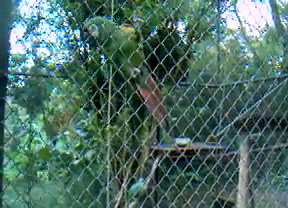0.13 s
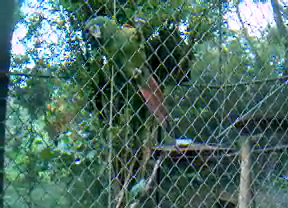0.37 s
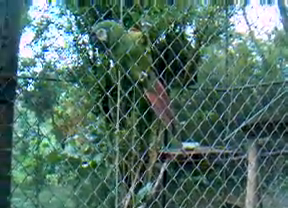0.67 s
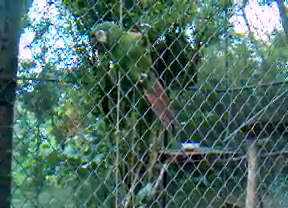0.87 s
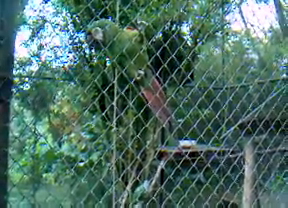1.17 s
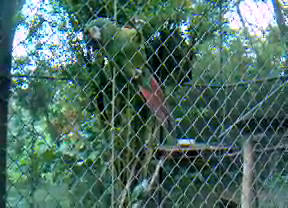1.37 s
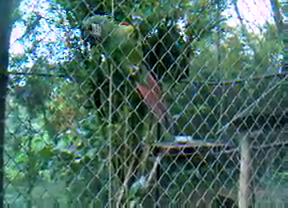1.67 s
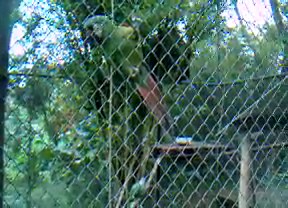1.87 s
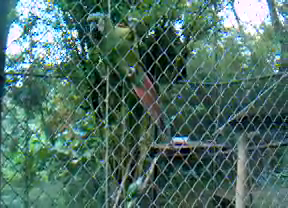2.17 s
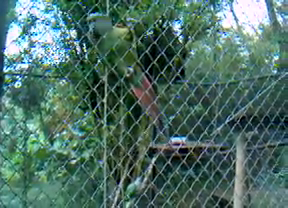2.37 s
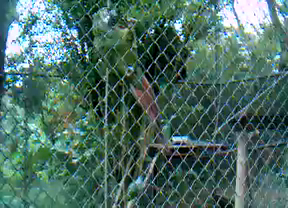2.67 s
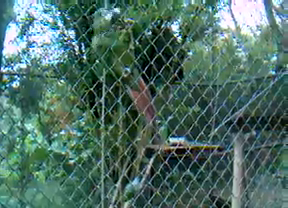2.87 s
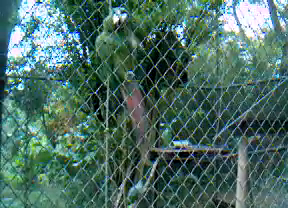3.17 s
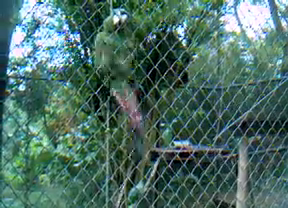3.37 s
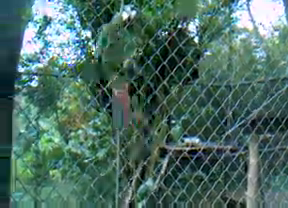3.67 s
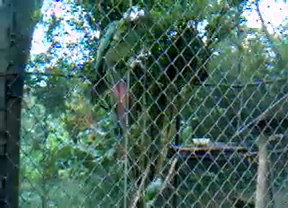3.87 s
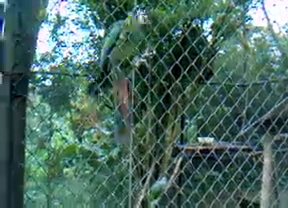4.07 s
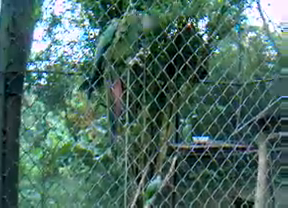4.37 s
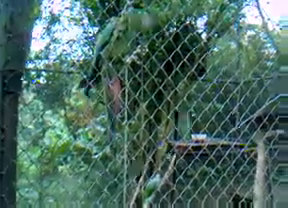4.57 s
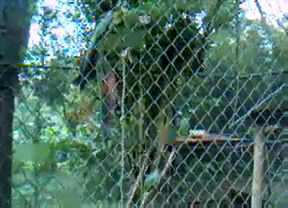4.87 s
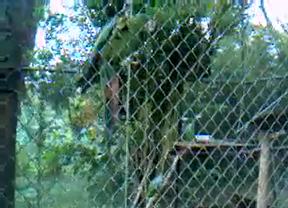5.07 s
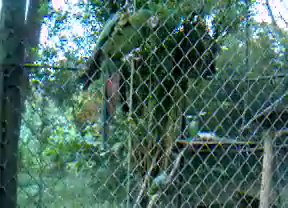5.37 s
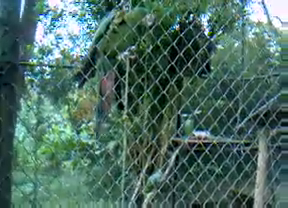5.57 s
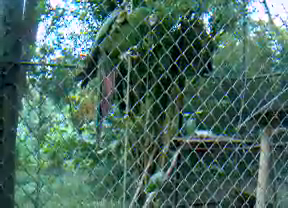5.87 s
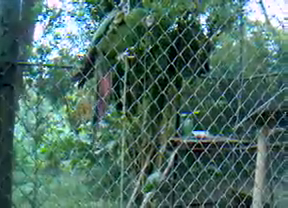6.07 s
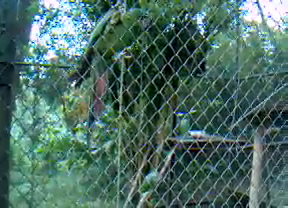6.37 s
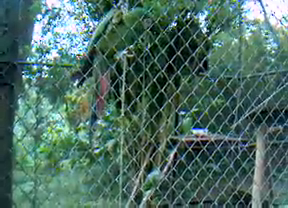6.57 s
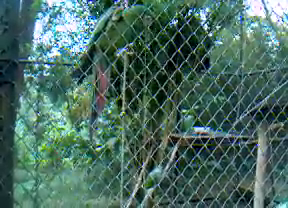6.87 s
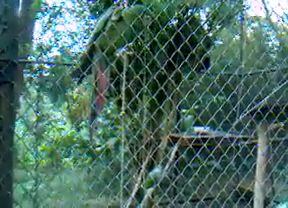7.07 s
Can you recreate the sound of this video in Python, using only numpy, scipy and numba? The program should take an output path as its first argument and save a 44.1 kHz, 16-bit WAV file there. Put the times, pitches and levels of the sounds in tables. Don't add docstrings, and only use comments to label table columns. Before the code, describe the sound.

Outdoors in a garden aviary, heard through a small, gritty, band-limited camera microphone. From 0 to about 2.5 s large parrots screech very close: a call already under way, a held screech at 0.2, another at 0.7, a short loud burst at 1.3 running into the longest screech until 2.0, and one more at 2.1. They are rasping and throbbing, with shrill squeals breaking through and crackling overload, each group dying into a fading note. Then it is much quieter: steady hush, high cricket chirps, distant breathy squawks and hoarse squeaks, thin whistles, a downward swoop at 3.6. Sound vanishes from 3.94 to 4.04, and a soft tick follows at 4.13. A whistle swoops up at 5.15; far squawks strengthen around 5.5. A buzzy rapid trill runs from 6.35 to 6.8, with wire ticks at 6.38 and, sharper, 6.47. At 6.85 a low growl leaps into a brief close squawk at 7.0.

```python
import sys
import numpy as np
from scipy import signal
from scipy.fft import rfft, irfft, next_fast_len
from scipy.io import wavfile
from scipy.ndimage import uniform_filter1d, map_coordinates
from numba import njit

SR = 44100
rng = np.random.default_rng(int(sys.argv[2]) if len(sys.argv) > 2 else 0)


def int16_out(signal):
    q = np.round(np.clip(np.atleast_2d(signal).T, -1, 1) * 32767)
    wavfile.write(sys.argv[1], SR, q.astype(np.int16))


def attenuation_scalar(level_db):
    decades = np.asarray(level_db, float) / 20
    return 10 ** decades


N = 318565

# frequency in Hz, level in dB per Hz.
HUSH_COLOUR = [(15, -33), (25, -5.5), (130, 0), (223, -6), (690, -9), (1210, -12.5), (1360, -8.5),
               (1700, -10.5), (1900, -10), (2550, -11), (4290, -6.5), (5500, -2), (7150, -34),
               (12100, -120)]
# middle of the chirp in seconds (less 0.012), peak level in dB.
CRICKET_CHIRPS = [(2.6349, -30), (2.7496, -34), (2.8599, -31), (2.9564, -35), (3.035, -33), (3.1779, -31.5),
                  (3.3804, -33.5), (3.4883, -38), (3.5816, -30.5), (3.7062, -33), (3.8051, -29),
                  (3.923, -31.5), (4.125, -27.5), (4.2327, -32.5), (4.3101, -32.5), (4.7437, -35),
                  (5.0567, -31), (5.2054, -30.5), (5.3457, -30), (5.4826, -28), (5.5871, -34.5),
                  (5.6778, -28.5), (5.8234, -30), (5.9574, -30.5), (6.0681, -24.5), (6.1667, -30),
                  (6.2782, -32.5), (6.9206, -29.5), (7.1359, -24)]
# frequency in Hz, time to fall 60 dB in seconds.
YARD_DECAY = [(500, .5), (2000, 0.65), (6000, 0.28)]

# start in seconds, hold in seconds, level in dB.
FAR_SQUAWKS = [(2.499, 0.18, -37), (2.831, 0.031, -34.5), (3.016, 0.032, -33.5), (3.208, 0.0086, -36.5),
               (3.82, 0.098, -41.5), (4.115, .02, -34.5), (4.32, 0.23, -41), (4.701, 0.53, -41),
               (5.19, .04, -34.5), (5.37, .03, -34), (5.5, 0.041, -29), (5.665, 0.018, -29.5),
               (5.84, 0.028, -32.5), (6.06, 0.27, -37.5), (6.4, 0.37, -34.5), (6.9, .05, -35),
               (7.04, .18, -35.5)]
# resonance in Hz, width in Hz, level in dB.
FAR_THROAT = [(1802, 600, -6.5), (3300, 450, -1), (5000, 1400, -0.5)]
# start in seconds, length in seconds, from Hz, to Hz, peak level in dB.
SQUEAKS = [(2.6, .09, 3300, 3400, -47), (2.82, .07, 3200, 3453, -41.5), (2.999, .06, 3450, 3450, -43.5),
           (3.4, .25, 1890, 1865, -51), (3.76, .11, 900, 895, -45.5), (4.08, .12, 3220, 3283, -39.5),
           (4.08, .12, 1600, 1900, -46.5), (4.263, .25, 830, 836, -49), (4.28, .09, 3220, 3345, -38.5),
           (4.38, .14, 4520, 4470, -43), (4.39, .09, 3290, 3420, -40), (4.497, .14, 3200, 3132, -42.5),
           (5.308, .11, 2757, 3240, -40.5), (5.33, .09, 1800, 1750, -44), (5.489, .09, 3300, 3128, -42),
           (5.629, .11, 3170, 3287, -37.5), (5.81, .08, 3100, 3291, -40.5), (6.11, .1, 3230, 3290, -42),
           (6.27, .08, 3224, 3282, -43.5), (7.05, .07, 4060, 3900, -40.5), (7.101, .04, 3300, 3258, -43.5),
           (7.18, 0.037, 1594, 1800, -40)]
# start in seconds, length in seconds, from Hz, to Hz, peak level in dB.
WHISTLES = [
    (1.08, 0.23, 3166, 3250, -40.5),
    (2.55, 1.18, 3947, 3750, -46),
    (2.5, 1.51, 2548, 2320, -49),
    (4.05, .6, 2327, 2255, -48.5),
    (4.66, .36, 4980, 5000, -47),
    (5.7, 0.37, 4970, 4943, -46),
    (6.771, .12, 2253, 2320, -46.5),
]
# time in seconds, pitch in Hz, level in dB.
SWOOPS = [
    [(3.575, 5500, -44), (3.62, 5250, -35.5), (3.65, 4816, -33), (3.69, 3815, -40.5), (3.75, 3300, -43)],
    [(5.135, 3300, -43), (5.165, 4120, -33.5), (5.195, 4850, -33.5), (5.22, 5500, -42.5)],
]
SWOOP_FLUTTER = (.014, .022)
# time in seconds, level in dB, held pitch in Hz.
TRILL = [
    (6.355, -33.5, 5500),
    (6.43, -26, 5480),
    (6.48, -28.5, 5234),
    (6.6, -30, 5176),
    (6.7, -31.5, 5217),
    (6.83, -41, 5360),
]
# time in seconds, peak level in dB.
BEAK_TICKS = [
    (4.1267, -25),
    (6.3802, -25),
    (6.4691, -19.5),
]

# start in seconds, hold in seconds, level in dB, attack in seconds,
# release in seconds.
SCREECHES = [
    (0.0, 0.019, -13, .01, 0.1),
    (.158, 0.35, -16.5, .012, 0.21),
    (.694, 0.28, -15, .045, 0.15),
    (1.285, 0.023, -11, .03, 0.044),
    (1.31, .72, -17, .03, 0.037),
    (2.08, 0.3, -17, 0.012, .22),
    (7.005, 0.0093, -17.5, .14, 0.032),
]
# resonance in Hz, width in Hz, level in dB.
NEAR_THROAT = [(1250, 860, -6), (1986, 700, -0.5), (3300, 900, -2.5), (4470, 900, -1), (5500, 1200, -6)]
# start in seconds, length in seconds, strongest line from Hz, to Hz,
# peak level in dB.
DEEP_NOTES = [
    (.355, 0.076, 2335, 2284, -23),
    (1.304, 0.05, 2166, 2306, -20.5),
    (1.371, .04, 2350, 2375, -18),
    (1.428, 0.038, 2364, 2428, -18.5),
]
# start in seconds, length in seconds, from Hz, to Hz, peak dB.
SHRILL_NOTES = [(0, 0.069, 1581, 1602, -25), (0.414, 0.041, 1914, 1814, -22),
                (0.698, 0.03, 1866, 2100, -21.5), (0.736, 0.036, 1526, 1578, -24.5),
                (.75, 0.048, 1084, 1097, -26), (0.794, 0.084, 2330, 2240, -25),
                (0.949, 0.032, 2562, 2510, -28), (0.991, 0.039, 1854, 1890, -28),
                (1.472, 0.042, 1711, 2000, -19), (1.514, 0.026, 1947, 1795, -20.5),
                (1.543, 0.042, 1750, 2110, -18.5), (1.587, 0.055, 1939, 1904, -18.5),
                (1.66, 0.038, 1910, 1823, -20), (1.695, 0.039, 1803, 1890, -20.5),
                (1.757, .028, 1870, 1872, -18), (1.788, 0.026, 1801, 1817, -22),
                (1.821, 0.028, 1783, 1851, -17), (1.797, 0.038, 1174, 1225, -23.5),
                (1.845, 0.034, 1750, 1698, -22.5), (2.08, 0.062, 1385, 1870, -19.5),
                (2.077, 0.028, 998, 1202, -23.5), (2.157, 0.027, 1733, 2173, -19),
                (2.198, 0.049, 2003, 1774, -19.5), (2.253, 0.027, 1876, 1952, -24),
                (2.29, 0.033, 1850, 1960, -21), (7.018, 0.025, 1315, 1288, -28.5)]
# start in seconds, length in seconds, from Hz, to Hz, peak dB.
FADING_NOTES = [
    (0, 0.17, 2104, 2132, -28.5),
    (0.491, .16, 2318, 2266, -27.5),
    (0.951, .3, 2264, 2303, -25.5),
    (2.33, .18, 1867, 1909, -25),
]
# start in seconds, length in seconds, from Hz, to Hz, peak dB.
UPPER_NOTES = [(0, 0.09, 3302, 3380, -27), (0, 0.061, 4122, 3975, -21.5), (0.351, 0.037, 4510, 4846, -25.5),
               (0.384, 0.038, 4490, 4800, -21), (.39, 0.028, 4220, 4340, -24),
               (0.449, .02, 3300, 3384, -26), (0.683, 0.08, 3258, 3316, -25),
               (0.803, 0.041, 3633, 3750, -25.5), (0.858, 0.059, 4530, 4570, -26),
               (1.311, 0.041, 3056, 3440, -23), (1.347, 0.035, 3350, 3363, -20.5),
               (1.336, 0.069, 4114, 4160, -26.5), (1.474, 0.06, 3447, 3564, -25.5),
               (1.564, 0.035, 3266, 3290, -26), (1.74, 0.032, 3147, 3264, -22.5),
               (1.775, .03, 4100, 4160, -25), (2.094, .045, 3242, 3574, -25),
               (2.242, 0.078, 3297, 3244, -24), (2.32, 0.13, 3240, 3255, -27.5)]
# time in seconds, strongest line in Hz, level in dB.
ARCHES = [
    [(0.19, 2443, -32), (0.225, 2743, -26), (0.27, 2915, -21), (0.36, 2920, -27.5)],
    [(1.86, 2324, -36), (1.896, 2760, -24), (1.972, 2953, -23), (2.03, 2872, -27), (2.075, 2820, -33)],
]
# time in seconds, pitch in Hz, level in dB.
GROWL = [
    (6.83, 598.3, -48),
    (6.87, 637.3, -38.5),
    (6.91, 713, -35),
    (6.925, 1024, -29),
    (6.96, 1250, -28.5),
    (7.0, 1311, -28.5),
    (7.02, 1288, -38.5),
]
# multiple of the line or pitch, level in dB.
DEEP_TONES = [(.5, -2.5), (1, -1), (1.5, -6), (2, -8), (2.5, -5.5)]
SHRILL_TONES = [(1, 0), (2, -10), (3, -8)]
ARCH_TONES = [(.5, -9.5), (1, -1), (1.5, -8.5), (2, -4.5)]
GROWL_TONES = [(1, 1.5), (1.4, -1.5), (2, -3.5), (2.4, -5.5), (3, -8), (4, -8)]

# peak at this share of the length, dB under the peak at the start, dB under it at the end,
# share of the glide done at the peak.
DEEP_SWELL = (.45, 2.9, 4.8, .7)
SHRILL_SWELL = (.5, 10, 8.7, .5)
FADING_SWELL = (.2, 4, 25, .5)
SQUEAK_SWELL = (.4, 7, 8, .6)
WHISTLE_SWELL = (.5, 1.8, 4, .55)

# time in seconds, baseline
SLIPS = [(0.0, -0.22), (0.0066, -0.21), (0.0104, 0.22), (0.0152, -0.33), (0.0227, -0.16),
         (0.0272, 0.24), (0.0343, 0.29), (0.0371, -0.21), (0.1601, -0.24), (0.1616, -0.39),
         (0.1656, -0.35), (0.1691, 0.41), (0.1774, 0.26), (0.1852, 0.33), (0.1996, 0.54),
         (0.2055, 0.37), (0.211, 0.32), (0.2141, 0.44), (0.2276, 0.09), (0.2321, 0.02),
         (0.2344, -0.1), (0.2439, 0.27), (0.2465, 0.25), (0.2571, 0.34), (0.2603, -0.31),
         (0.2635, 0.34), (0.2837, -0.4), (0.2895, -0.2), (0.291, 0.31), (0.2955, -0.15),
         (0.2997, 0.34), (0.3025, 0.42), (0.3126, 0.2), (0.3244, -0.05), (0.3261, 0.04),
         (0.3303, 0.39), (0.3347, 0.19), (0.3395, 0.24), (0.341, 0.4), (0.3947, -0.31),
         (0.4153, 0.18), (0.4457, 0.17), (0.4478, -0.25), (0.6934, 0.37), (0.6981, 0.26),
         (0.7003, 0.51), (0.7019, 0.01), (0.7034, 0.25), (0.7401, -0.37), (0.7438, 0.28),
         (0.7612, 0.3), (0.7772, -0.51), (0.7787, -0.25), (0.7912, -0.38), (0.8171, -0.14),
         (0.8309, -0.3), (0.8323, 0.28), (0.8524, 0.42), (0.8699, 0.4), (0.8736, -0.36),
         (0.879, -0.19), (0.8926, 0.47), (0.894, 0.0), (0.8971, -0.32), (0.9111, -0.25),
         (1.2897, 0.07), (1.2966, -0.29), (1.3003, 0.06), (1.3017, -0.39), (1.3038, -0.03),
         (1.306, 0.3), (1.3082, -0.27), (1.334, -0.22), (1.3461, -0.34), (1.3555, -0.4),
         (1.3737, -0.18), (1.4126, 0.23), (1.4185, -0.4), (1.4276, -0.28), (1.4374, -0.22),
         (1.439, -0.3), (1.4662, -0.36),
         (1.4944, 0.29), (1.5455, 0.36), (1.5511, 0.34), (1.5629, 0.26), (1.577, -0.42),
                (1.5833, -0.3), (1.616, 0.17), (1.6293, -0.42), (1.6316, 0.26), (1.6396, -0.36),
                (1.645, -0.1), (1.6479, -0.37), (1.6564, -0.02), (1.6587, 0.32), (1.6821, 0.26),
                (1.6873, -0.29), (1.6955, 0.2), (1.697, -0.42), (1.7027, -0.18), (1.7256, -0.4),
                (1.7402, 0.28), (1.8211, -0.35), (1.8335, -0.14), (1.8487, 0.52), (1.8504, 0.05),
                (1.8518, -0.29), (1.8604, -0.36), (1.8742, 0.42), (1.8786, -0.09), (1.8997, 0.43),
                (1.9044, 0.39), (1.9106, 0.36), (1.9181, -0.07), (1.9284, -0.14), (1.9299, 0.4),
                (1.933, 0.29), (1.9471, 0.3), (1.9548, 0.31), (1.9595, 0.28), (1.9825, 0.36),
                (1.9905, -0.47), (1.9921, 0.44), (1.9996, 0.32), (2.0108, 0.35), (2.014, -0.11),
                (2.0184, 0.3), (2.0229, -0.34), (2.0275, 0.3), (2.0308, 0.5), (2.0345, 0.37), (2.0363, 0.1),
         (2.1072, 0.38), (2.114, 0.25), (2.1212, 0.3), (2.144, -0.47), (2.1457, -0.26), (2.1472, 0.42),
              (2.1488, 0.03), (2.1577, 0.34), (2.1629, -0.29), (2.1834, -0.29), (2.1893, 0.12),
              (2.1943, 0.35), (2.1982, -0.33), (2.212, -0.25), (2.2366, -0.39), (2.2473, -0.33),
              (2.2713, -0.18), (2.2742, -0.39), (2.2889, -0.24), (2.299, -0.13), (2.3306, -0.3),
              (2.3462, 0.45), (2.3478, -0.42), (6.9763, 0.27), (6.9802, -0.42), (6.9819, 0.31),
              (6.989, 0.19), (6.9917, -0.27), (7.0004, 0.32), (7.0063, -0.0), (7.008, -0.19),
              (7.0105, 0.11), (7.0136, -0.45), (7.0166, 0.34), (7.0201, 0.11)]
# start in seconds, end in seconds.
DROPOUT = (3.9405, 4.0404)
BLOCK_STARTS = (274, 379)
HOLD, BLOCK = 4, 505


def unit(x):
    return x / np.sqrt(np.mean(x ** 2) + 1e-20)


def along(points, hz):
    point_hz, value = np.transpose(points)
    return np.interp(np.log(hz + 1), np.log(point_hz + 1), value)


def wobble(rate, size=N):
    knots = rng.standard_normal(int(size * rate / SR) + 4)
    return map_coordinates(knots, [np.arange(size) * rate / SR])


def filtered(x, response):
    size = next_fast_len(N + SR // 2)
    spectrum = rfft(x, size) * response(np.fft.rfftfreq(size, 1 / SR))
    return irfft(spectrum, size)[:N]


def resonances(modes):
    def response(f):
        total = 0
        for k, (centre, width, db) in enumerate(modes):
            ring = 1j * f * width / (centre * centre - f * f + 1j * f * width)
            total = total + (-1) ** k * attenuation_scalar(db) * ring
        return total
    return response


def rasp(rate_hz, modes, wander, jitter, breath):
    cycle = np.cumsum(rate_hz * np.exp(wander * wobble(35) + jitter * wobble(600))) / SR
    starts = np.diff(np.floor(cycle), prepend=0) > 0
    pulses = starts * attenuation_scalar(3 * wobble(500))
    air = rng.standard_normal(N) * (1 + np.cos(2 * np.pi * cycle))
    return unit(filtered(unit(pulses) + breath * unit(air), resonances(modes)))


def calls(rows, sag_db=0):
    t = np.arange(N) / SR
    gains = []
    for s, hold, db, attack, release in rows:
        outside = np.maximum(np.maximum((s - t) / attack, (t - s - hold) / release), 0)
        gains.append(attenuation_scalar(db - 20 * outside - sag_db * np.clip(t - s, 0, hold)))
    return np.max(gains, axis=0)


def swell(row, shape):
    s, length, from_hz, to_hz, db = row
    peak, rise_db, fall_db, done = shape
    peak_s = s + np.clip(peak, .02, .98) * length
    peak_hz = from_hz + done * (to_hz - from_hz)
    return [(s, from_hz, db - rise_db), (peak_s, peak_hz, db), (s + length, to_hz, db - fall_db)]


def note(rows, tones, flutter, rough_db):
    s, hz, db = np.transpose(rows)
    start, stop = int(s[0] * SR), min(int(s[-1] * SR), N)
    t = np.arange(start, stop) / SR
    pitch = np.interp(t, s, hz) * (1 + flutter * wobble(150, size=len(t)))
    phase = 2 * np.pi * np.cumsum(pitch) / SR
    stack = sum(attenuation_scalar(level + rough_db * wobble(90, size=len(t))) * np.sin(k * phase) for k, level in tones)
    out = np.zeros(N)
    out[start:stop] = np.sqrt(2) * attenuation_scalar(np.interp(t, s, db)) * stack * signal.windows.tukey(len(t), .1)
    return out


def hush():
    def colour(hz):
        return attenuation_scalar(along(HUSH_COLOUR, hz)) * (hz < 5600)
    return attenuation_scalar(-37 + .7 * wobble(2.7)) * unit(filtered(rng.standard_normal(N), colour))


def cricket():
    t = np.arange(N) / SR
    chirps = sum(attenuation_scalar(db) * np.exp(-((t - s - .012) / 0.022) ** 2) for s, db in CRICKET_CHIRPS)
    strokes = rasp(130, [(5480, 200, 0)], wander=.1, jitter=.2, breath=1.6)
    return attenuation_scalar(-6) * (chirps + attenuation_scalar(-46)) * strokes


def yard(x):
    hz, t, z = signal.stft(rng.standard_normal(SR // 2), SR, nperseg=256)
    fade = attenuation_scalar(-60 * t / along(YARD_DECAY, hz)[:, None])
    tail = signal.istft(z * fade, SR, nperseg=256)[1]
    delayed = np.pad(x, (700, 0))
    return signal.fftconvolve(delayed, tail / np.linalg.norm(tail))[:N]


def far_squawks():
    attack_s, release_s, murmur_db = .08, .12, -50
    gain = calls([(*row, attack_s, release_s) for row in FAR_SQUAWKS]) + attenuation_scalar(murmur_db)
    voice = rasp(1600, FAR_THROAT, wander=.1, jitter=.2, breath=1.5)
    return gain * attenuation_scalar(-1.5 + 1.5 * wobble(40)) * voice


def far_squeaks():
    tones = [(.53, -13), (0.99, 0.5), (1.07, -7)]
    squeaks = np.zeros(N)
    for row in SQUEAKS:
        gain = attenuation_scalar(2.5 if row[2] > 2900 else -1.5)
        squeaks += gain * note(swell(row, SQUEAK_SWELL), tones, flutter=.015, rough_db=4.0)
    stutter = np.sin(2 * np.pi * np.cumsum(75 + 12 * wobble(20)) / SR)
    return squeaks * (1 + .65 * stutter)


def whistles():
    held = sum(note(swell(row, WHISTLE_SWELL), [(0.99, 0.0013)], flutter=.006, rough_db=4.0)
               for row in WHISTLES)
    swoops = sum(note(rows, [(1, 0)], flutter=flutter, rough_db=1.83)
                 for rows, flutter in zip(SWOOPS, SWOOP_FLUTTER))
    return attenuation_scalar(1.0) * (held + swoops)


def trill():
    s, db, hz = np.transpose(TRILL)
    t = np.arange(N) / SR
    on = np.interp(t, [s[0] - .004, s[0], s[-1], s[-1] + .004], [0, 1, 1, 0])
    share = (19.6 * np.cumsum(on) / SR) % 1
    rise_hz = 1100 * np.maximum(1 - share / 0.29, 0)
    phase = 2 * np.pi * np.cumsum(np.interp(t, s, hz) - rise_hz + 90 * wobble(500)) / SR
    buzz = 1 + 0.66 * np.sin(2 * np.pi * np.cumsum(420 + 90 * wobble(200)) / SR)
    gain = on * attenuation_scalar(np.interp(t, s, db) + 6.0 + 2.1 * wobble(250))
    return gain * np.sin(np.pi * share) ** 0.4 * buzz * np.sin(phase)


def wire():
    out, t = np.zeros(N), np.arange(200) / SR
    for s, db in BEAK_TICKS:
        out[round(s * SR):][:len(t)] += attenuation_scalar(db + 3 - 60 * t / .004) * rng.standard_normal(len(t))
    return out


def near_parrots():
    voices = unit(sum(rasp(hz, NEAR_THROAT, wander=.13, jitter=.045, breath=.4) for hz in (820, 1170)))
    chaos = calls(SCREECHES, sag_db=1.5) * attenuation_scalar(-1.5 + 2.0 * wobble(60)) * voices
    deep = sum(note(swell(row, DEEP_SWELL), DEEP_TONES, flutter=.008, rough_db=2.0) for row in DEEP_NOTES)
    strong = [swell(row, SHRILL_SWELL) for row in SHRILL_NOTES]
    strong += [swell(row, FADING_SWELL) for row in FADING_NOTES]
    shrill = sum(note(rows, SHRILL_TONES, flutter=0.019, rough_db=2.5) for rows in strong)
    upper = sum(note(swell(row, SHRILL_SWELL), [(1, 0.00027)], flutter=.012, rough_db=3)
                for row in UPPER_NOTES)
    arches = sum(note(rows, ARCH_TONES, flutter=0.016, rough_db=4) for rows in ARCHES)
    growl = attenuation_scalar(4.4 * wobble(700)) * note(GROWL, GROWL_TONES, flutter=.08, rough_db=5.0)
    clear = attenuation_scalar(2.0 + 2.6 * wobble(350)) * (shrill + upper)
    clear = clear + attenuation_scalar(-0.1 + 1.4 * wobble(350)) * deep
    return chaos + clear + attenuation_scalar(3.0) * arches + attenuation_scalar(-3.5) * growl


def scene():
    birds = far_squawks() + far_squeaks() + whistles() + trill() + wire() + near_parrots()
    return (hush() + cricket() + attenuation_scalar(-15.5) * yard(birds) + birds)[None]


def baseline(size, reach, thrash, spikes, settle_s):
    rail, slam_s = .75, 0.00095
    rate = SR / HOLD
    index = np.arange(size)
    block = (index - np.where(index < DROPOUT[1] * rate, *BLOCK_STARTS)) // BLOCK
    offset, swings, life = np.zeros(size), np.zeros(size + 64), np.arange(64) / rate
    slips = SLIPS
    bursts = rng.standard_normal((len(slips), len(life)))
    for (s, level), burst in zip(slips, bursts):
        at = round(s * rate)
        jump = abs(level - offset[max(at - 1, 0)])
        offset[at:][block[at:] <= block[at + 9]] = level
        slam = (np.sign(level) * rail - level) * min(abs(level) / .2, 1) * np.exp(-life / slam_s)
        swing = thrash * uniform_filter1d(burst, size=4) + spikes * burst
        swings[at:at + len(life)] += slam + jump * swing * np.exp(-life / settle_s)
    return reach * offset + swings[:size]


@njit
def four_bit(x, top, grow):
    out, held, step = np.empty_like(x), 0., 1e-3
    for n in range(len(x)):
        code = min(int(4 * abs(x[n] - held) / step), 7)
        held = min(max(held + np.sign(x[n] - held) * (code + .5) * step / 4, -top), top)
        step = min(max(step * grow ** (2 * code - 6 if code > 3 else -1), 2e-4), top)
        out[n] = held
    return out


def band_limit(x):
    return signal.sosfilt(signal.butter(12, 15830, fs=SR, output="sos"), x)


def record(dry):
    slow = dry[0, ::HOLD]
    slips = baseline(len(slow), reach=1.06, thrash=0.34, spikes=0.9, settle_s=0.0014)
    stored = four_bit(slow + slips, 0.73, 1.1)
    held = np.repeat(stored, HOLD)[:N]
    smooth = filtered(held, lambda hz: attenuation_scalar(np.interp(hz, [6850, 7000, 7350], [0, -10, -70])))
    out = np.clip(smooth, -.708, .708) - .0007
    t = np.arange(N) / SR
    out = out + attenuation_scalar(-32.5) * np.exp(-abs(t - DROPOUT[1]) / 0.00026)
    out[round(DROPOUT[0] * SR):round(DROPOUT[1] * SR)] = 0
    return band_limit(out[None])


dry = scene()
out = record(dry)
int16_out(out)
```